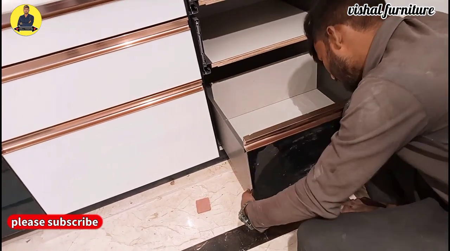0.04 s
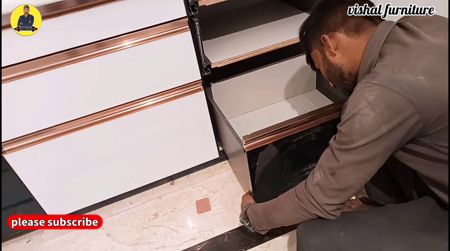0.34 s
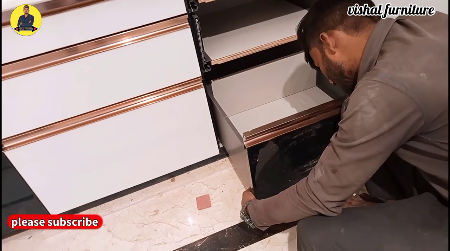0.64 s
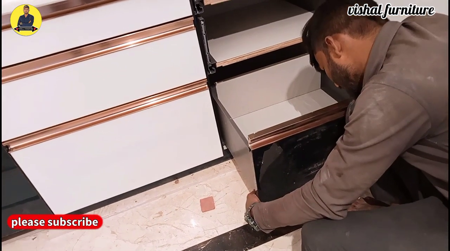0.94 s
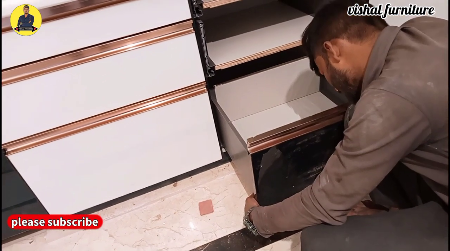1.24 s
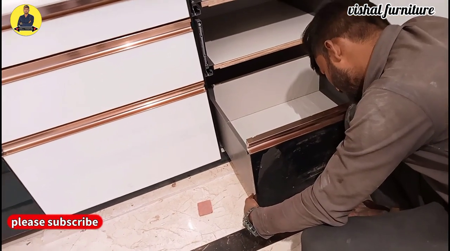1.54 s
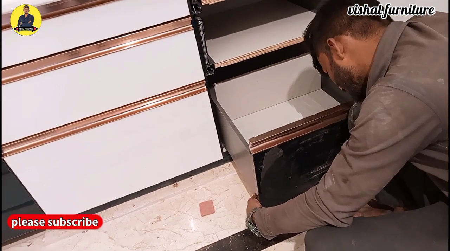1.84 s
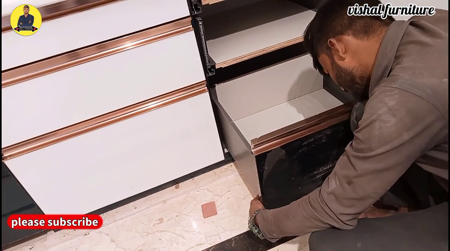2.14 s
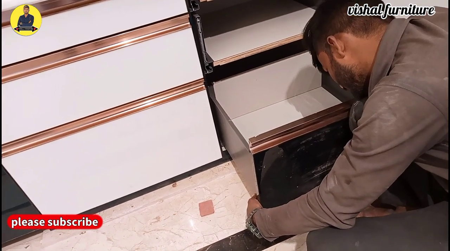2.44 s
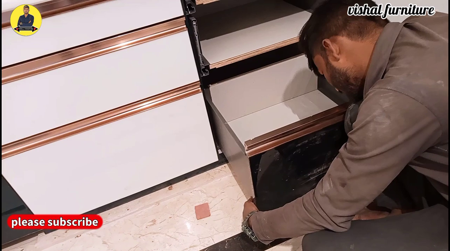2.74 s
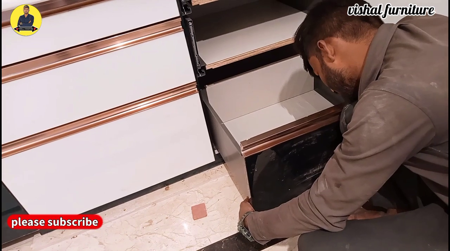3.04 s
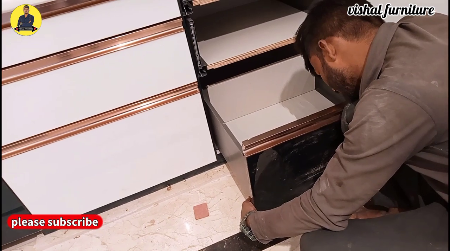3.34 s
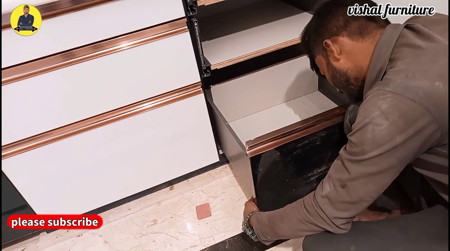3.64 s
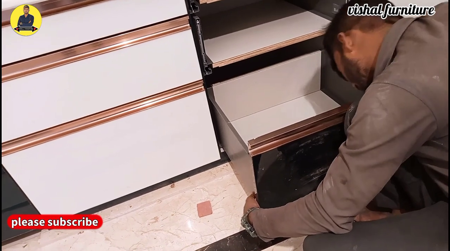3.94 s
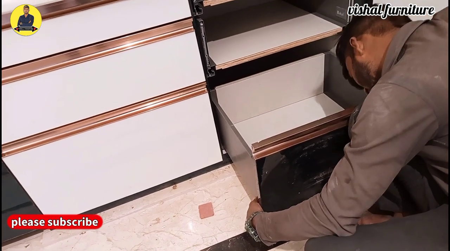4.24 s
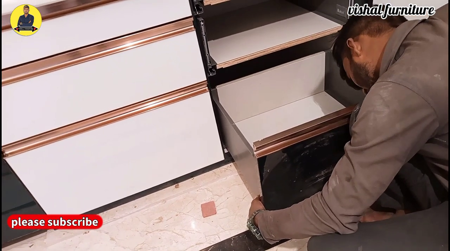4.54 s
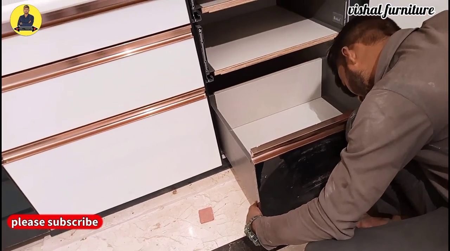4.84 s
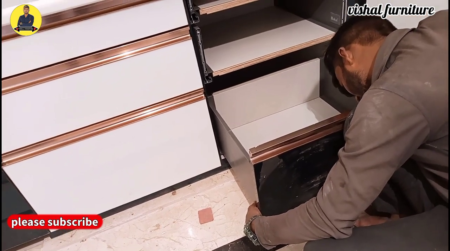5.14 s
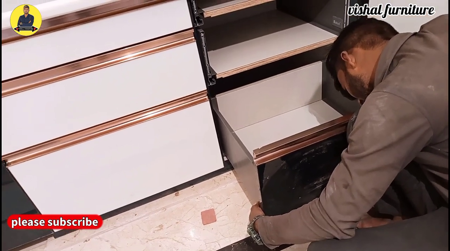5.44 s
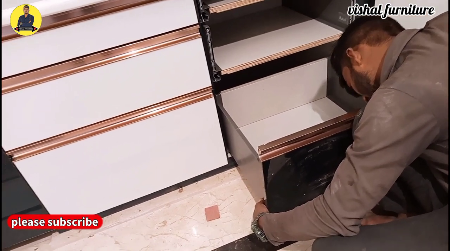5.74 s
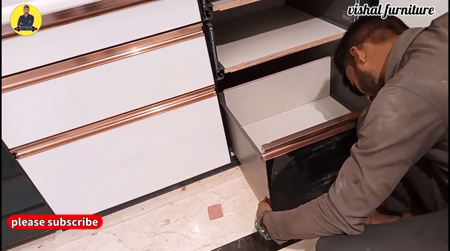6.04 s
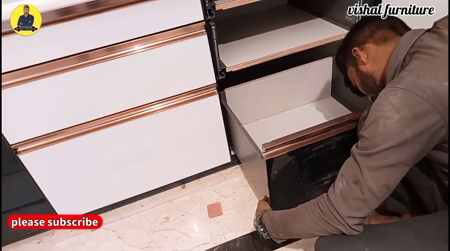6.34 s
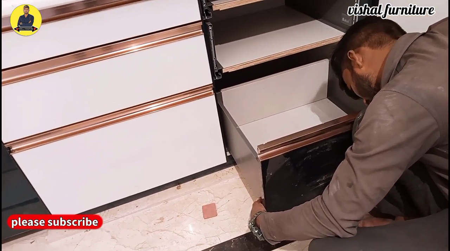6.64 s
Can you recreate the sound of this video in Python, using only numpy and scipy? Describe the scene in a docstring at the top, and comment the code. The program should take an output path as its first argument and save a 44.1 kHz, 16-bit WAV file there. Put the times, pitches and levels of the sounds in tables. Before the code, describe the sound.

Soft rubbing and a dull bump sound close to the microphone. Then a chipboard kitchen drawer is jiggled onto its steel runners, knocking unevenly against the cabinet, with one sharp click and a faint squeak. A loud rubbing swish comes just past the middle. The drawer rolls and scrapes briefly, the runners chink, and the hardest knocks follow, with faint ticks and crackle. The small, hard room rings a little.

```python
"""Soft rubbing and a dull bump sound close by. Then a chipboard kitchen drawer is jiggled onto its
steel runners in a small hard room. It knocks against the cabinet: hard contacts ring the treble,
heavy ones the bass. The runners chink when struck, roll, scrape and squeak faintly. One loud
rubbing swish comes midway. There is also one sharp click, a few faint dry ticks and, late on,
a faint high crackle."""
import sys
import numpy as np
from scipy import signal
from scipy.fft import rfft, irfft, next_fast_len
from scipy.io import wavfile
from scipy.ndimage import map_coordinates

SR = 44100
rng = np.random.default_rng(int(sys.argv[2]) if len(sys.argv) > 2 else 0)


def wrap_up_sound(samples):
    """Save the sound to the file named by the first command line argument, as 16-bit audio."""
    columns = np.atleast_2d(samples).T
    # keep every value between -1 and 1, then stretch to whole-number steps
    tamed = np.clip(columns, -1, 1)
    steps = np.round(tamed * 32767).astype(np.int16)
    wavfile.write(sys.argv[1], SR, steps)


N = 295334
TIME = np.arange(N) / SR
TOP_HZ = 15750

# Tone colours of the noises. Each row: frequency in Hz, relative level in dB.
ROOM_SPECTRUM = [(15, -40), (25, -8), (215, 0.5), (600, -4), (1400, -10), (1950, -21.5), (15500, -35.5)]
FLUTTER_SPECTRUM = [(20, -45), (45, -13), (90, 0), (230, -1.5), (380, -5), (700, -10.5), (1400, -17),
                    (2500, -80)]
SWISH_SPECTRUM = [(500, -59), (1200, 1.5), (2100, 0), (3200, -4.5), (4200, -7), (7000, -15), (11000, -24),
                  (15000, -56)]
HISS_SPECTRUM = [(3000, 1), (7000, 6.1), (10000, 4), (13000, 2), (15500, -5)]
CABINET_SPECTRUM = [(60, -3.5), (100, 8.5), (200, -5.5), (450, 11.5), (690, -2), (1100, 2), (1520, -11.5),
                    (2200, -12.5), (3000, -26.5), (7000, -39), (10500, -40.5), (15500, -57.5)]
RUMBLE_SPECTRUM = [(50, -12), (100, 6.5), (300, 6.5), (600, 4), (1100, 10.5), (1500, -11.5), (2500, -44)]
SCRAPE_SPECTRUM = [(700, -24), (1400, 11), (2100, 8), (3000, -7), (4300, -10), (7000, -22), (14000, -67)]
# Rubbing strokes. Each row: start, peak and end in seconds, level and brightness in dB.
RUBS = [(-0.2, 0.036, 0.59, -45, 1.5), (0.087, 0.172, 0.26, -44, -17), (0.18, 0.32, 0.45, -50.5, 4.5),
        (0.31, 0.592, 2.26, -53, -5.5), (3.803, 3.985, 4.75, -25, -16), (3.821, 4.121, 4.375, -24, 3.5),
        (6.267, 6.422, 6.65, -47, -4)]
# The firmest rub whistles: start, peak and end in seconds.
WHISTLE_TIMES = (3.805, 3.96, 4.4)
# Blows on the drawer. Each row: start in seconds, level, hardness and weight in dB,
# two boosted frequencies and one weakened frequency in Hz.
KNOCKS = [(0.454, -27, -4, 2, 385, 780, 435), (1.042, -34, -18, -4, 315, 950, 415),
          (1.062, -24, -2.5, -0.5, 437, 1000, 262), (1.169, -26, -4.5, -1.5, 411, 1045, 240),
          (1.542, -35, -21.5, -6.5, 415, 940, 1250), (1.637, -29, -7.5, 5, 303, 430, 825),
          (1.913, -28.5, -2, -5.5, 570, 650, 225), (1.993, -38, -1, 1, 520, 1060, 177),
          (2.591, -47.5, -15, 15.5, 340, 563, 1180), (2.694, -32.5, -22.5, -3.5, 870, 1030, 1230),
          (2.787, -38, -15, 5.5, 416, 910, 184), (2.826, -26.5, -8.5, 0, 458, 947, 715),
          (3.402, -28, -8, 2.5, 470, 580, 152), (3.410, -21, 6, 5.5, 343, 456, 160),
          (3.661, -30.5, -7.5, 10.5, 251, 333, 500), (3.742, -44.5, 14.5, 5, 248, 1300, 1040),
          (4.278, -19.5, 3, -1, 700, 810, 425.7), (4.508, -39.5, -2.5, -4, 476, 1080, 300),
          (4.565, -33, -0.5, 4, 182, 1280, 154), (4.669, -29, 7.5, -6.5, 516, 1135, 373),
          (4.860, -23, 1, -2.5, 403, 955, 368), (5.292, -18.5, 5.5, 1.5, 180, 1084, 464),
          (5.324, -19, -10, 1, 175, 196, 290), (5.660, -41.5, 5, 11, 182, 1280, 920),
          (6.051, -63, 35, 8, 174, 1370, 960)]
# The drawer's own tones. Each row: pitch in Hz, level in dB, seconds to fade by 60 dB.
DRAWER_TONES = [(101.8, -8, 0.63), (180, -13, 1), (211.7, -12, 0.71), (307.5, -8, 0.59),
                (342.6, -7.5, 0.39), (414.3, -4.5, 0.57), (468.6, -6, 0.74), (489, -8, 1), (585.7, 6, 0.26),
                (784, -15, 0.72), (862, -10.5, 0.68), (944.4, -2, 0.34), (1062, -3.5, 0.46),
                (1258, -6, 0.072), (1353, -12, 0.46), (2106, -12.5, 0.13)]
# The room's echo. Each row: frequency in Hz, seconds to fade by 60 dB.
ROOM_DECAY = [(80, 1), (210, 0.94), (560, 0.82), (1470, 0.52), (3880, 0.65), (10200, 0.31)]
# A knock's five bands, low to high: thud, box, panel, clack, steel.
# Each row: level in dB, share of the hardness, share of the weight.
KNOCK_BANDS = [(-15.5, 0.035, 1), (-5, 0.049, 0.86), (-1, 0.24, 0.13), (-8.5, 0.67, 0), (-27.5, 1, 0.2)]
# The borders of those bands in Hz.
BAND_EDGES = [85, 250, 700, 1500, 4000, 16000]
# One sharp click, then faint ticks. Each row: start in seconds, peak in dB, centre frequency in Hz.
TICKS = [(0.9119, -26.5, 1350), (0.966, -41.5, 11060), (4.758, -39.5, 9100), (4.927, -39.5, 7900),
         (5.463, -37, 5660), (5.478, -33, 9000), (5.673, -35, 9700), (5.989, -39.5, 1016),
         (6.457, -38.5, 8950)]
# Hits on a runner. Each row: start in seconds, most boosted frequency in Hz, level in dB.
PINGS = [(1.063, 3770, -38), (1.876, 2990, -43.5), (1.893, 2470, -30), (1.913, 4200, -42),
         (2.826, 3800, -44), (3.410, 8000, -36), (4.564, 1540, -28), (4.659, 2090, -32), (4.671, 3400, -25),
         (4.842, 1750, -17), (4.862, 2340, -19), (5.294, 2000, -14.5), (5.295, 6630, -32.5),
         (6.052, 1320, -35.5)]
# A steel runner's own tones. Each row: pitch in Hz, level in dB.
RUNNER_TONES = [(1245, 14.5), (1985, 5.5), (2330, 4), (2830, -2.5), (3400, -5.5), (3880, -4), (4550, -3.5),
                (6600, -9), (9650, -8)]
# Pushes along the runners. Each row: start, peak and end in seconds, rumble and scrape in dB.
PUSHES = [(1.857, 1.885, 2.19, -39.5, -38), (1.95, 2.053, 2.2, -39.5, -78),
          (4.34, 4.55, 4.95, -29.5, -42.5), (5.61, 5.637, 5.92, -38.5, -41.5)]
# Runner squeaks. Each row: start, peak and end in seconds, starting pitch in Hz, level in dB.
SQUEAKS = [(2.319, 2.433, 3.24, 849, -53.5)]
# Spells of faint crackle. Each row: start, peak and end in seconds, level in dB.
CRACKLES = [(4.5, 4.635, 4.98, -60), (5.05, 5.716, 5.97, -60)]


def amp(db):
    """Turn decibels into a gain."""
    return 10 ** (np.asarray(db) / 20)


def unit(x):
    """Scale x to an average (rms) level of 1."""
    return x / np.sqrt(np.mean(x ** 2) + 1e-20)


def along(points, hz):
    """Read between (Hz, value) points on a log frequency axis."""
    f, v = np.transpose(points)
    return np.interp(np.log(hz + 1), np.log(f + 1), v)


def bell(hz, centre_hz, width=0.082):
    """A bell curve over pitch, 1 at its centre."""
    return np.exp(-(np.log(hz / centre_hz) / width) ** 2)


def wobble(rate):
    """A smooth curve through `rate` random points a second."""
    return map_coordinates(rng.standard_normal(int(N * rate / SR) + 4), [TIME * rate])


def filtered(x, response):
    """Scale each frequency of x by response(Hz)."""
    size = next_fast_len(len(x) + 8192)
    return irfft(rfft(x, size) * response(np.fft.rfftfreq(size, 1 / SR)), size)[:len(x)]


def coloured(x, spectrum):
    """Shape x with a spectrum, at level 1."""
    return unit(filtered(x, lambda hz: amp(along(spectrum, hz))))


def noise(spectrum, size=N):
    """Noise with the given spectrum, at level 1."""
    return coloured(rng.standard_normal(size), spectrum)


def grains(per_second, spread_db):
    """Random tiny spikes of uneven size."""
    hits = rng.random(N) < per_second / SR
    return hits * rng.standard_normal(N) * amp(spread_db * rng.standard_normal(N))


def band(x, low_hz, high_hz, order):
    """Keep what lies between two frequencies."""
    edges = [low_hz, min(high_hz, SR / 2 - 1000)]
    return signal.sosfilt(signal.butter(order, edges, "band", fs=SR, output="sos"), x)


def add(track, start, sound):
    """Mix a sound into the track at `start` seconds."""
    part = track[max(round(start * SR), 0):][:len(sound)]
    part += sound[:len(part)]


def stroke(start, peak, end, swell_db, curve=1.42, fade_s=0.052):
    """A gain that swells to 1, falls, and past its ends drops 20 dB every fade_s."""
    dip = np.interp(TIME, [start, peak], [1, 0]) ** curve + np.interp(TIME, [peak, end], [0, 1])
    outside_s = np.abs(TIME - np.clip(TIME, start, end))
    return amp(-swell_db * dip - 20 * outside_s / fade_s)


def fading(x, share):
    """Each frequency of x dies away in a share of the room's echo time."""
    hz, age, spectra = signal.stft(x, SR, nperseg=256)
    decay_s = share * along(ROOM_DECAY, hz)[:, None]
    return signal.istft(spectra * amp(-60 * age / decay_s), SR, nperseg=256)[1][:len(x)]


def room_tone(level_db=-56):
    """The quiet room: low noise whose level drifts a little."""
    return amp(level_db + wobble(2.75)) * noise(ROOM_SPECTRUM)


def rubbing(swish_db=-8, hiss_db=-24, whistle_db=-38, lumps_db=2, whistle_hz=(2920, 3580)):
    """Dry rubbing close by: a lumpy low flutter under a fine, slightly whistling swish."""
    flutter, swish, hiss = np.zeros((3, N))
    firmest_db = max(row[3] for row in RUBS)
    for *times, db, bright_db in RUBS:
        flutter += amp(db) * stroke(*times, swell_db=21, curve=0.61)
        swish += amp(db + bright_db + swish_db) * stroke(*times, swell_db=26)
        # the hiss depends less on pressure, so light strokes are airier
        airy_db = firmest_db + 0.87 * (db - firmest_db)
        hiss += amp(airy_db + bright_db + hiss_db) * stroke(*times, swell_db=10.5, fade_s=0.024)
    low = flutter * unit(amp(lumps_db * wobble(45)) * noise(FLUTTER_SPECTRUM))
    high = swish * noise(SWISH_SPECTRUM) + hiss * noise(HISS_SPECTRUM)
    narrow_noise = unit(band(rng.standard_normal(N), *whistle_hz, order=2))
    whistle = amp(whistle_db) * stroke(*WHISTLE_TIMES, swell_db=26) * narrow_noise
    roughness = unit(amp(wobble(190)))
    return low + (high + whistle) * roughness


def bump(start=0.034, hz=150, level_db=-20, decay_s=0.03):
    """A soft dull bump close by: one low tone that dies at once."""
    out, t = np.zeros(N), np.arange(SR // 10) / SR
    thump = amp(level_db - 60 * t / decay_s) * np.cos(2 * np.pi * hz * t)
    add(out, start, band(thump, 40, 980, order=2))
    return out


def blow(t, swell_s, colour_db, tones_db=-5, early_db=10, early_share=0.41, ripple_db=16):
    """One blow: a crack at the contact, then the panels, cabinet and room ring."""
    hz, db, decay_s = np.transpose(DRAWER_TONES)[:, :, None]
    strength = amp(db + colour_db(hz) + 2 * rng.standard_normal(hz.shape))
    hz = hz * (1 + 0.00978 * rng.standard_normal(hz.shape))  # the drawer rests differently each time
    # the ring dies in two stages: quickly in the box, then slowly in the room
    fall_db = -60 * t / decay_s
    envelope = np.hypot(amp(fall_db), amp(early_db + fall_db / early_share))
    tones = np.sum(strength * envelope * np.sin(2 * np.pi * (hz * t + rng.random(hz.shape))), 0)
    # the box has many weak tones of its own; the room evens them out
    grid_hz = np.arange(40, 16000, 25)
    room_db = along(CABINET_SPECTRUM, grid_hz) + colour_db(grid_hz)
    box_db = room_db + ripple_db * np.tanh(rng.standard_normal(len(grid_hz)) / 2)
    box = fading(noise(np.c_[grid_hz, box_db], len(t)), early_share)
    room = fading(noise(np.c_[grid_hz, room_db], len(t)), share=0.98)
    ring = amp(tones_db) * tones + amp(early_db) * box + room
    crack = amp(3 - 60 * t / 0.083) * noise([(600, 27), (2000, 13.5), (4500, 0.5), (16000, -18)], len(t))
    # the panels take a few milliseconds to get moving, the contact far less
    return crack * (1 - np.exp(-10 * t / swell_s)) + ring * (1 - np.exp(-t / swell_s))


def knocks(boost_db=7, cut_db=9):
    """The drawer hits the cabinet: hard contacts ring the treble, heavy ones the bass."""
    out, t = np.zeros(N), np.arange(SR * 3 // 4) / SR
    attack = t < 0.04
    for start, level_db, hardness_db, weight_db, low_hz, high_hz, weak_hz in KNOCKS:
        # the spot that is struck boosts two pitch regions and weakens a third
        colour_db = lambda f: boost_db * (bell(f, low_hz) + bell(f, high_hz)) - cut_db * bell(f, weak_hz)
        swell_s = 0.0086 * 2 ** (-hardness_db / 25)  # soft contacts swell more slowly
        # a stronger, harder contact is briefer and reaches higher into the treble
        reach_hz = min(19000 * 2 ** ((level_db + hardness_db) / 32), TOP_HZ)
        ring = band(blow(t, swell_s, colour_db), BAND_EDGES[0] / 2, reach_hz, order=4)
        for (db, hard, heavy), low, high in zip(KNOCK_BANDS, BAND_EDGES, BAND_EDGES[1:]):
            part = band(ring, low, high, order=4)
            boost = np.sqrt(np.mean(amp(colour_db(np.arange(low, high))) ** 2))
            gain = boost * amp(level_db + db + hard * hardness_db + heavy * weight_db)
            add(out, start, gain * part / np.std(part[attack]))
    return out


def ticks(decay_s=0.0099):
    """One sharp click and a few faint dry ticks, each a short burst of noise."""
    out, t = np.zeros(N), np.arange(SR // 40) / SR
    for start, db, hz in TICKS:
        burst = rng.standard_normal(len(t)) * amp(-60 * t / decay_s)
        tick = band(burst, hz / 2, hz * np.sqrt(2), order=1)
        add(out, start, amp(db) * tick / np.abs(tick).max())
    return out


def pings(attack_s=0.0022, chink_s=0.061, ring_s=0.27, ring_db=-14, detune=0.017):
    """A struck steel runner: clusters of close tones chink briefly, then ring on faintly."""
    out, t = np.zeros(N), np.arange(SR // 2) / SR
    envelope = (1 - np.exp(-t / attack_s)) * (amp(-60 * t / chink_s) + amp(ring_db - 60 * t / ring_s))
    hz, tone_db = np.transpose(RUNNER_TONES)[:, :, None]
    for start, boosted_hz, db in PINGS:
        strength = amp(tone_db) * bell(hz, boosted_hz, width=0.56)
        cluster_hz = hz * (1 + detune * rng.standard_normal((len(hz), 5)))
        tones = np.sin(2 * np.pi * (cluster_hz[..., None] * t + rng.random(cluster_hz.shape)[..., None]))
        add(out, start, amp(db) * envelope * unit(np.sum(strength * tones.sum(axis=1), axis=0)))
    return out


def rolling(rumble_db=-3, scrape_db=-4, width_hz=14):
    """Rollers chatter and scrape over the steel track and shake the drawer's panels."""
    rumble = sum(amp(db + rumble_db) * stroke(*times, swell_db=10.5) for *times, db, _ in PUSHES)
    scrape = sum(amp(db + scrape_db) * stroke(*times, swell_db=36) for *times, _, db in PUSHES)
    panels = lambda f: 0.1 + sum(amp(db) / (1 + ((f - hz) / width_hz) ** 2) for hz, db, _ in DRAWER_TONES)
    chatter = coloured(grains(per_second=2500, spread_db=2), RUMBLE_SPECTRUM)
    return rumble * unit(filtered(chatter, panels)) + scrape * noise(SCRAPE_SPECTRUM)


def squeak(rise_hz_per_s=85, waver=0.0177):
    """A runner sings faintly as it sticks and slips, its pitch creeping up."""
    out = np.zeros(N)
    for start, peak, end, hz, db in SQUEAKS:
        pitch = (hz + rise_hz_per_s * (TIME - start)) * (1 + waver * wobble(160))
        tone = unit(np.sin(2 * np.pi * np.cumsum(pitch) / SR))
        out += amp(db) * stroke(start, peak, end, swell_db=13) * tone
    return out


def crackle(clumps_db=3):
    """Faint, high, fine-grained crackle that comes in clumps."""
    specks = grains(per_second=2500, spread_db=5.5)
    clumps = coloured(specks * amp(clumps_db * wobble(18)), HISS_SPECTRUM)
    return clumps * sum(amp(db) * stroke(*times, swell_db=12) for *times, db in CRACKLES)


def scene():
    """Mix the quiet room, the small noises and the drawer into one channel."""
    mix = room_tone() + rubbing() + bump() + knocks() + ticks() + pings() + rolling() + squeak()
    return (mix + crackle())[None]


def record(dry):
    """Cut away the very highest treble."""
    return filtered(dry[0], lambda hz: hz < TOP_HZ)[None]


dry = scene()
out = record(dry)
wrap_up_sound(out)
```